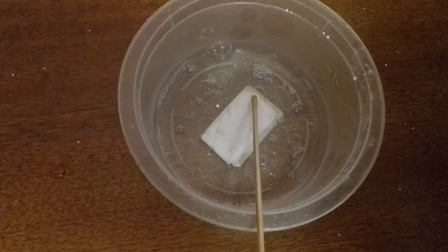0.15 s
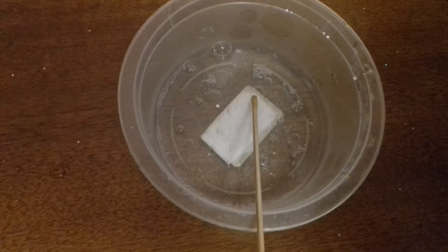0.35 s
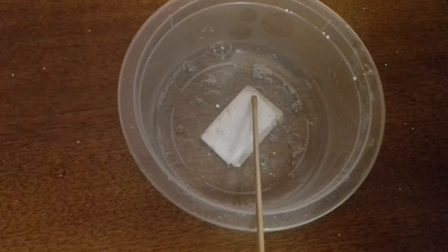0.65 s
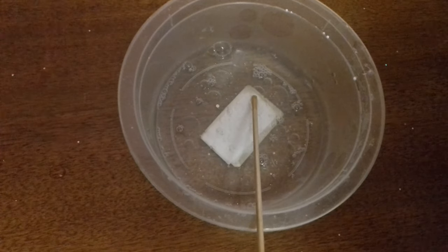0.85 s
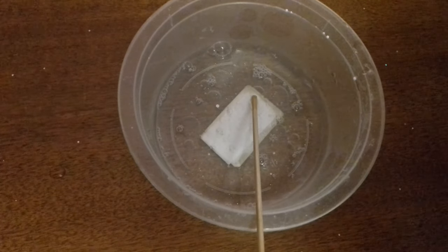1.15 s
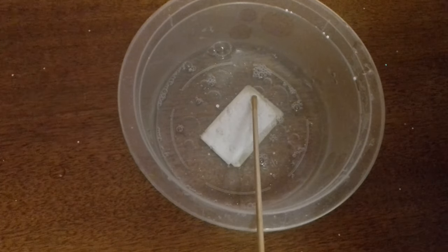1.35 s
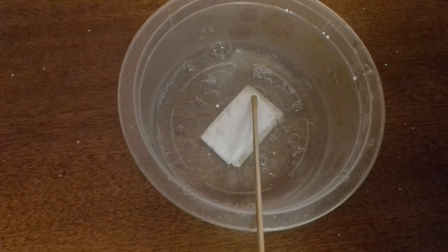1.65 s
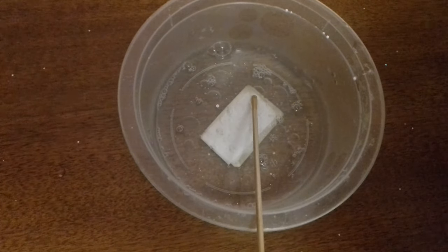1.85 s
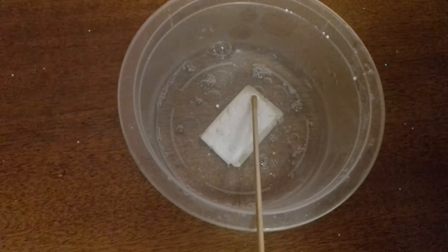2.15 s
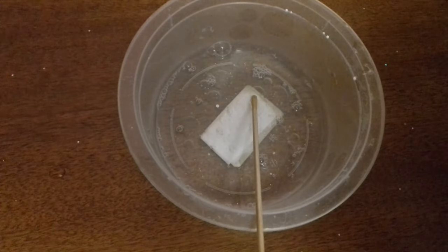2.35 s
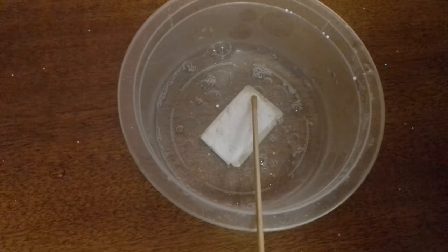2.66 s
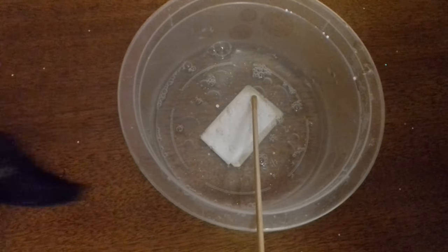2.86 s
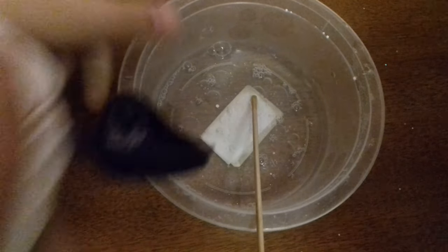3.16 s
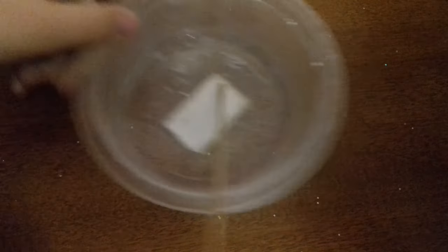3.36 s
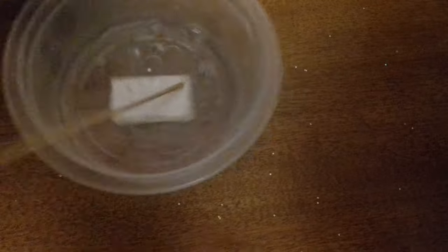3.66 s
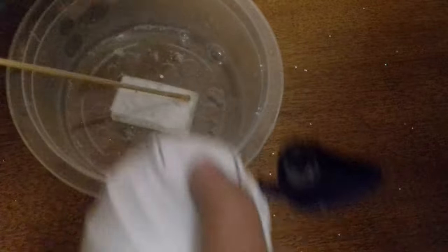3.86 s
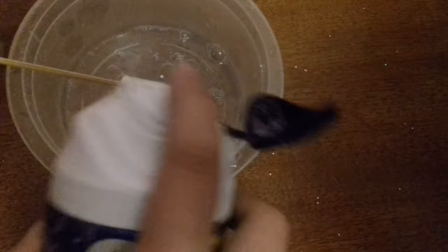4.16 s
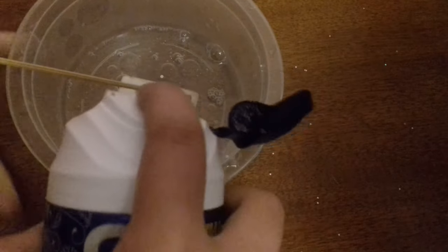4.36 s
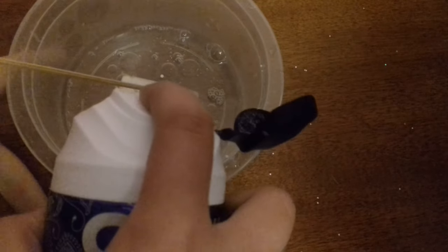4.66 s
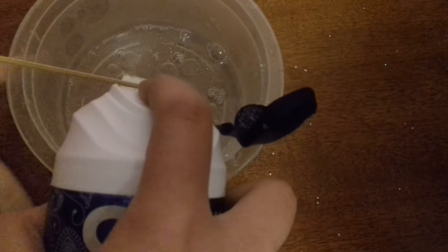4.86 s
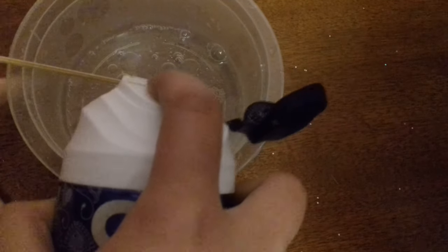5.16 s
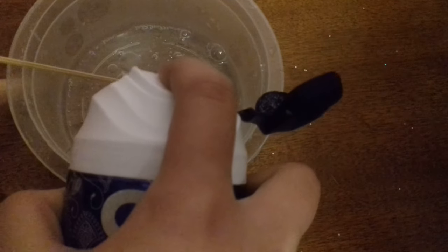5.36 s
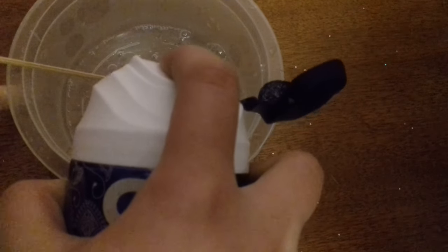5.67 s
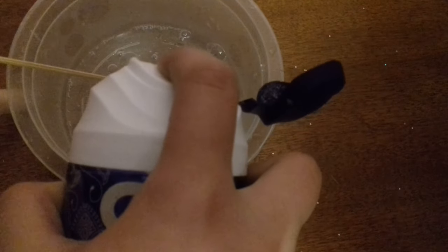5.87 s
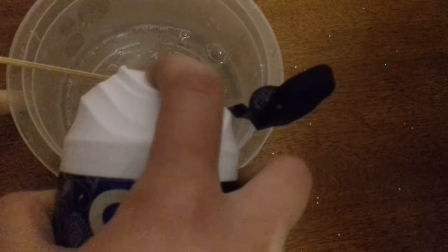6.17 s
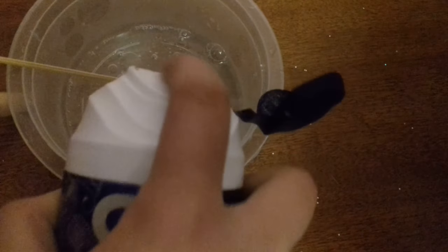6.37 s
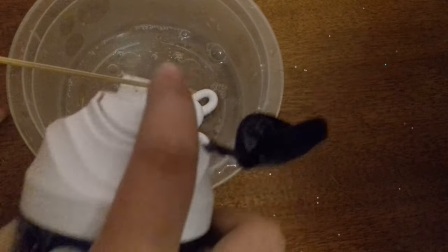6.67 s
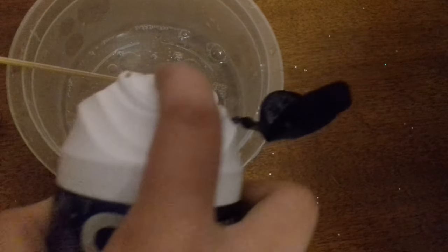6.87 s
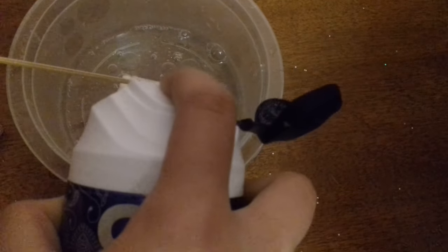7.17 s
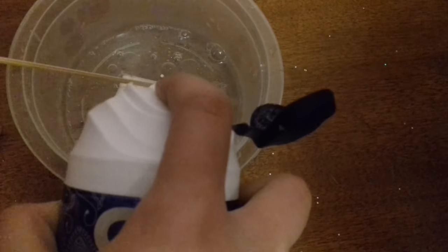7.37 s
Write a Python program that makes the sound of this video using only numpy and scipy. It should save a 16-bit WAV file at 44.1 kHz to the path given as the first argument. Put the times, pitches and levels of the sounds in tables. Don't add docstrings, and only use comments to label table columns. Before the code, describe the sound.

Small quiet room, faint air and microphone hiss, everything close and nearly dry. From 0 to 0.65 s a can is gripped busily: crinkling skin, dense plastic ticks and small hollow knocks. It calms to faint rubbing and isolated clicks, with a can knock at 1.4 s and sharper raps and a thin squeak around 2.0-2.2 s. At 3.3-3.5 s a plastic bowl is gripped and dragged, scraping and skipping over wood, then lands at 3.77 s with the loudest hard, hollow clack and a short rattle. The can knocks at 4.26 s. At 4.6-4.75 s the valve leaks, spits and pops sharply; a bowl nudge follows. Bright, grainy foam hiss flows from 4.8 to 5.43 s, then 5.58-5.88 and 5.92-6.4 s, surging, growing wetter. It stops with fading fizz; a knock at 6.52 s, then two brief spurts from 7.26 s to the end.

```python
import sys
import numpy as np
from scipy import signal
from scipy.fft import rfft, irfft, next_fast_len
from scipy.io import wavfile
from scipy.ndimage import map_coordinates

SR = 44100
rng = np.random.default_rng(int(sys.argv[2]) if len(sys.argv) > 2 else 0)


def waveform_to_disk(signal):
    frames = np.transpose(np.atleast_2d(signal))
    scaled = np.clip(frames, -1, 1) * 32767
    samples = np.round(scaled).astype(np.int16)
    wavfile.write(sys.argv[1], SR, samples)


def ratio_of_db(decibels):
    return 10 ** (np.asarray(decibels, float) / 20)


N = 331218

# pitch_hz, level_db (per Hz)
JET_SPECTRUM = [(35, -50.5), (60, -37), (489, -16), (984, -22), (1760, -21), (2700, -13.5), (3630, 1.5),
                (4800, -3.5), (6210, -21), (9440, -25), (12000, -30.5), (15800, -40)]
RUB_SPECTRUM = [(35, -36), (60, -10), (194, -14.5), (248, -21.5), (378, -8), (493, -14.5), (658, -7.5),
                (1710, 0), (2080, -5.5), (2970, -12), (4330, 0.5), (6040, -22), (12000, -36.5),
                (15600, -60), (22000, -120)]
AIR_SPECTRUM = [(30, -4.5), (64, -17), (141, -3), (435, -5.5), (906, -7.5), (2000, -13), (3020, -23.5),
                (4300, -12.5), (6000, -39), (15800, -31)]
SELF_NOISE_SPECTRUM = [(30, -10), (148, -7.5), (628, -9), (1840, -10.5), (4250, -18), (15800, -24)]

# pitch_hz, width_hz, level_db
NOZZLE_GAS = [(1450, 130, -31.5), (2350, 160, -10.5), (3230, 280, -5), (3780, 280, 9), (4410, 270, 2),
              (4900, 320, -3), (5050, 160, -27), (5500, 260, -7.5), (6680, 350, -12), (7770, 200, -43),
              (8450, 250, -18.5), (9650, 300, -33), (11020, 350, -28), (13700, 600, -35)]
NOZZLE_FOAM = [(1000, 170, -17.5), (2404, 310, -14), (3600, 480, -5), (4200, 170, -8.5), (4803, 240, 4.5),
               (5750, 310, -17), (6810, 310, -15), (7800, 320, -23), (8700, 280, -13.5), (9060, 220, -20),
               (9650, 380, -15.5), (10720, 430, -22.5), (11760, 250, -32.5), (13600, 700, -35)]
NOZZLE_DRY = [(960, 180, -9.5), (2000, 290, -13), (2750, 250, -18), (3700, 300, -2.5), (4130, 550, -1.5),
              (4950, 300, -7.5), (5690, 380, -14.5), (7500, 240, -30.5), (8800, 630, -17), (9920, 370, -16),
              (11640, 510, -27), (14020, 900, -26)]
SNAP_PEAKS = [(3020, 1500, 4), (4180, 780, 9), (5050, 810, -8), (5900, 670, -15), (6770, 600, -29)]
SHELL_PEAKS = [(1100, 270, -8), (1600, 330, -7), (2060, 230, 4.5), (2600, 146, -1.5)]
BOWL_PEAKS = [(171, 42, -1.5), (250, 24, -1), (305, 42, -5), (456, 89, -2.5)]
WALL_PEAKS = [(1020, 120, 11.5), (1382, 390, -4.5), (2030, 330, 5.5), (2950, 180, -8)]
# pitch_hz, level_db, t60_s
TABLE_MODES = [(302.6, -11, 0.11), (437, -3, 0.095), (468, -3.5, .08), (520, -2, 0.088), (598, -3, 0.084),
               (678, -12, .07), (755, -24, 0.074), (967, -5.5, 0.073), (1174, -16.5, 0.15),
               (1236, -17.5, 0.12), (1420, -18, 0.15), (2070, -23, .07), (2600, -15.5, .06)]
CAN_MODES = [(1200, -13.5, .12), (1820, -10, 0.14), (2240, -12, .05), (2490, -2.5, 0.15), (2550, -8, .12),
             (2870, -14, 0.072), (3300, 4, 0.066), (3640, -2, 0.1), (4040, -11, 0.055), (4250, -14, .15),
             (4460, -9, 0.15)]
# low_hz, high_hz
JET_BANDS = [(1870, 5990), (5790, 21000), (70, 1755)]

# peak_s, crinkle_db, rise_s (per 20 dB), fall_s (per 20 dB)
SQUEEZES = [(0.005, -49.5, .05, 0.12), (0.045, -51.5, 1, 0.08), (.087, -53.5, 0.5, 0.1),
            (.12, -62, -0.5, 0.5), (.157, -47, .015, 0.14), (.215, -52.5, 0.1, 0.13),
            (.262, -46, 0.1, 0.14), (.297, -50, 0.14, 0.1), (.345, -54.5, 0.07, 0.08),
            (.405, -50.5, .008, 0.18), (.445, -53, 0.16, 0.04), (.523, -44, 0.02, 0.0252),
            (.542, -46.5, 0.04, 0.08), (.64, -63.5, 0, 0.5)]
FIDGETS = [(.7, -81.5, 0.096, 0.7), (.876, -53.5, 0.26, 0.036), (1.08, -67.5, 0.71, 0.037),
           (1.238, -62, 0.5, 0.5), (1.85, -56, 0.11, 0.11), (1.93, -54.5, 0.13, 0.14),
           (1.995, -60, 0.019, 0.014), (2.03, -59, 0.044, 0.028), (2.31, -57.5, 0.023, 0.042),
           (2.447, -60, 0.18, 0.49), (2.6, -74, .02, 0.064), (2.73, -63, 0.27, 0.61),
           (3.066, -65.5, 0.61, 0.39), (4.187, -56.5, 0.022, 0.1), (7.195, -72, 0.051, 0.071),
           (4.87, -55.5, 0.08, 0.55)]
DRAGS = [
    (3.365, -51, 0.056, 0.058),
    (3.42, -43.5, 0.1, 0.34),
    (3.455, -42, 0.028, 0.085),
    (3.492, -38, 0.11, 0.011),
    (3.51, -50, 0.024, 0.28),
    (3.72, -69, 0.56, 0.27),
    (3.9, -48.5, 0.47, 0.11),
    (4.78, -51.5, .02, 0.078),
]
# peak_s, boom_db, rise_s (per 20 dB), fall_s (per 20 dB)
TABLE_LOADS = [(.53, -72, .1, .15), (3.3, -53, .012, .1), (3.405, -49, .03, .1), (3.51, -49, .025, .07),
               (3.58, -54, .04, .07), (3.67, -57, .08, .12), (3.775, -44, .008, .1), (3.86, -51, .12, .08),
               (3.94, -60, .08, .06), (4.02, -68, .05, .1), (4.75, -58, .02, .15), (4.8, -53, .06, .2),
               (4.86, -56, .1, .06), (4.96, -59, .15, .05), (5.04, -70, .1, .15)]
# peak_s, level_db, rise_s (per 20 dB), fall_s (per 20 dB)
BOWL_SHAKES = [
    (3.295, -61.5, 0, 0.84),
    (3.395, -44.5, 0.0354, 0.13),
    (3.49, -42, 0.0829, 0.1243),
    (3.545, -74.5, -2.5, -0.5),
    (3.775, -36.5, -0.03, 0.12),
    (4.785, -50, 0.08, 0.11),
    (4.92, -65, -1.4, 0.64),
]
# start_s, crinkle_db, body_db, scrape_db, fall_s (per 20 dB)
SETTLING = [
    (1.389, -50, -57, -51, 1.2),
    (1.999, -49, -71.5, -74, 0.2),
    (2.168, -53, -47.5, -68.5, 0.4),
    (3.773, -35.5, -38.5, -26, 0.26),
    (4.265, -58.5, -47, -55.5, 0.12),
    (4.745, -44, -53, -53, -1.5),
]
# start_s, snap_db, mid_db
TICKS = [(0.0217, -45, -64), (0.044, -43, -47), (0.1543, -52, -38), (0.206, -47, -46), (0.2487, -45, -40),
         (.261, -36, -62), (0.28, -42, -57), (.2935, -36.5, -60), (0.304, -45, -60), (.3371, -50, -55),
         (.445, -47, -53), (.4938, -47, -56), (.5033, -41, -59), (.538, -38, -51), (0.642, -60, -59),
         (0.8927, -46, -73), (1.0632, -41.5, -74), (1.1046, -43.5, -76), (1.2254, -45.5, -60),
         (1.998, -37, -66), (2.0394, -53, -70), (2.1492, -42.5, -50), (2.297, -65, -58),
         (2.489, -43.5, -73), (3.271, -51.5, -63), (3.3217, -65, -71), (3.3441, -50, -57),
         (3.5225, -39, -41), (3.567, -49, -62), (3.962, -36.5, -64), (3.974, -60, -72), (3.984, -54, -67),
         (4.5959, -36.5, -58), (4.9337, -42, -62), (5.3041, -36, -56), (5.3908, -47, -52),
         (5.546, -51, -75), (6.4757, -43.5, -65), (2.17, -35.5, -50), (3.4915, -32.5, -60),
         (3.3642, -43.5, -54)]
# start_s, snap_db, mid_db, body_hz, body_db
CAN_KNOCKS = [(0.0868, -44, -44, 891, -69), (0.1361, -47, -49, 784, -52.5), (0.234, -33.5, -55, 940, -49),
              (0.3164, -48, -46, 614, -66), (0.4025, -56, -43.5, 1100, -52),
              (0.5212, -34.5, -35.5, 980, -50), (1.3862, -32, -48.5, 540, -45),
              (1.992, -32.5, -53, 1130, -67), (2.157, -26, -38.5, 1220, -63), (4.1821, -52, -76, 1100, -62),
              (4.2611, -34, -35, 510, -44), (6.5227, -44, -51.5, 1110, -63)]
# start_s, snap_db, body_hz, body_db
BOWL_BUMPS = [
    (3.276, -47.5, 231, -67),
    (3.2906, -38, 250, -50.5),
    (3.38, -34, 236, -45.5),
    (3.4456, -27.5, 497, -56),
    (3.476, -31, 294, -44),
    (3.4846, -31, 408, -49.5),
    (3.4916, -31.5, 476, -39.5),
    (3.5415, -36, 310, -50.5),
    (3.7645, -13, 520, -29.5),
    (4.7797, -36, 253, -41),
]
# start_s, snap_db, mid_db
POPS = [
    (4.655, -39, -33.5),
    (4.6771, -22.5, -38.5),
    (4.712, -26, -50),
    (4.7216, -22, -48),
]
# start_s, level_db, low_hz, t60_s
CRACKS = [(0.99, -64, 5500, 0.02), (3.7655, -47, 3500, 0.0094), (6.4763, -49.5, 1700, 0.0087),
          (6.5255, -58, 5000, .012), (7.3945, -44, 2000, .01), (7.4435, -44, 1700, 0.014),
          (7.4695, -43, 2200, .01), (3.4925, -47, 4000, 0.0073), (3.5665, -53, 4000, .008),
          (2.17, -61, 5000, .012)]
# start_s, length_s, from_hz, to_hz, level_db
SQUEAKS = [
    (1.226, 0.015, 5110, 4760, -50.5),
    (1.99, 0.051, 2350, 2370, -57.5),
    (2.152, 0.063, 2555, 2600, -46.5),
    (3.791, 0.12, 3480, 4520, -49),
    (4.714, 0.0122, 2310, 3300, -35.5),
    (4.719, 0.013, 2685, 3440, -32.5),
    (3.764, 0.0049, 5900, 5380, -27.5),
]
# start_s, pitch_hz, level_db, t60_s
PINGS = [(1.3864, 559, -33, 0.038), (4.2612, 1480, -38, .04), (4.2626, 2430, -39, .04),
         (6.5253, 1137, -36, 0.022), (7.297, 1000, -52, .02), (7.394, 1010, -42.5, 0.031),
         (7.479, 1000, -50, .02), (7.488, 1000, -40, 0.028), (7.488, 1950, -45, .02),
         (2.296, 2600, -52, 0.044), (4.654, 4200, -26, .012), (2.151, 5400, -47, .02),
         (2.158, 4900, -47, .03)]
# start_s, level_db
SET_DOWNS = [
    (3.381, -45.5),
    (3.7655, -24),
    (4.2615, -42.5),
    (4.779, -46.5),
]
# start_s, level_db
RAPS = [
    (1.995, -54),
    (2.1575, -40),
    (4.2615, -53.5),
]
# start_s, end_s, first_db, last_db, fall_s (per 20 dB)
SPUTTERS = [
    (4.572, 4.606, -56.5, -50, -0.1),
    (4.628, 4.652, -35, -25.5, -0.09),
    (4.654, 4.666, -22.5, -20, -0.043),
    (4.672, 4.68, -29, -26, -0.05),
    (4.69, 4.716, -39, -43.5, -0.24),
    (4.717, 4.74, -34, -36.5, -0.1),
    (4.74, 4.7455, -35.5, -38, -0.11),
]
# start_s, end_s, first_db, last_db, edge_db (relative to jet)
HOLDS = [
    (4.757, 4.793, -44, -36.5, -13),
    (4.808, 4.896, -41, -42.5, -9.5),
    (4.905, 5.433, -43.5, -42, -6.5),
    (5.579, 5.779, -46.5, -40.5, -6),
    (5.802, 5.878, -41, -39.5, -4.5),
    (5.919, 6.396, -43, -37.5, -8),
    (7.257, 7.357, -52, -42, -14.5),
    (7.377, 7.518, -44, -39, -12.5),
]
# time_s, nozzle_share (0-1), heap_share (0-1)
FOAM = [(4.6, 0.07, 0.6), (4.9, 0.02, 0.7), (5.15, 0.01, 0.36), (5.43, 0.12, 0.43), (5.8, 0.17, 0.2),
        (5.95, 0.94, 0.31), (6.2, 0.87, 0.58), (6.3, 0.51, 0.72), (7.27, 0, 0.5), (7.5, 0.57, 0.95)]
# start_s, peak_db
SURGES = [(4.9152, -36), (4.9347, -30), (4.9586, -36), (5.0579, -36), (5.132, -30), (5.1522, -29),
          (5.2061, -32), (5.2275, -32), (5.2834, -25), (5.3048, -29), (5.3398, -30), (5.3906, -28),
          (5.5937, -30.5), (5.6451, -33), (5.7064, -37), (5.7289, -37), (5.7758, -30), (5.8066, -25.5),
          (5.8282, -28), (5.915, -37), (5.9843, -36), (6.0407, -28.5), (6.2342, -32), (7.2544, -43),
          (7.3093, -33), (7.3213, -34), (7.3736, -31), (7.389, -27), (7.414, -42), (7.4474, -34),
          (7.469, -28)]

# body, scrape, boom minus crinkle in dB; steepness of these low layers
SQUEEZE_COLOUR, FIDGET_COLOUR, DRAG_COLOUR = (-2, 2.5, -37, 1), (-12, -18.5, -32, 0.4), (-4.5, -14, -34, 1.2)
SETTLE_RISE_S, SETTLE_FIRST_FALL_S, SETTLE_TAIL_DB = 0.0035, 0.04, -16
TABLE_HZ, TABLE_SWAY_SHARE, TABLE_SWAY_PER_S, TABLE_RUMBLE, WALL_DB = 80, .06, 12, .45, -6
TICK_BODY_HZ, TICK_BODY_DB, TICK_T60_S = 500, -33, 0.03
CAN_T60_S, BOWL_MID_DB, BOWL_T60_S = 0.095, -14, 0.036
POP_BODY_HZ, POP_BODY_DB, POP_T60_S = 985, -39, 0.03
SQUEAK_WIDTH_HZ, SQUEAK_PURITY = 343, 1
SPUTTER_OPEN_S, SPUTTER_EDGE_DB, SPUTTER_SLOSH_DB, SPUTTER_SLOSH_FOLLOWS = 0.0021, -21.5, -40, 0.35
VALVE_OPEN_S, VALVE_SHUT_S, SLOSH_SHUT_S, EDGE_SHUT_S = 0.0059, 0.012, 0.065, .02
SLOSH_BARE_DB, SLOSH_HEAP_DB = -28, 20
FIZZ_DB, FIZZ_FALL_S = -19.5, 0.2
SURGE_DB, SURGE_DELAY_S, SURGE_RISE_S, SURGE_FALL_S = -10, 0.0016, 0.0027, 0.013
SPUTTER_END_S, WANDER_SHARE, WANDER_PER_S = 4.75, .004, 5
ROOM_T60_S, ROOM_DB, SPRAY_ROOM_DB, ROOM_BASS_CUT_HZ, ROOM_CUT_HZ = 0.35, -11, -18, 700, 6300
AIR_DB, SELF_NOISE_DB = -69.5, -68.5
BASS_CUT_HZ, TOP_HZ, OFFSET, OVERLOAD = 68.5, 15850, -0.00052, 0.61


def rms_one(x):
    return x / np.sqrt(np.mean(x ** 2) + 1e-20)


def colour(x, spectrum):
    hz, level_db = np.transpose(spectrum)
    size = next_fast_len(N)
    log_hz = np.log(np.arange(size // 2 + 1) * SR / size + 1)
    gain = ratio_of_db(np.interp(log_hz, np.log(hz), level_db))
    return rms_one(irfft(rfft(x, size) * gain, size)[..., :N])


def band(x, low_hz, high_hz):
    return signal.sosfilt(signal.butter(3, [low_hz, high_hz], "band", fs=SR, output="sos"), x)


def drift(rate):
    r = np.exp(-16 * np.pi * rate / SR)
    slow = signal.lfilter([1], [1, -2 * r, r * r], rng.standard_normal(N // 8 + 2002))[2000:]
    return np.interp(np.arange(N) / 8, np.arange(len(slow)), rms_one(slow))


def resonate(x, hz, width_hz):
    r = np.exp(-np.pi * width_hz / SR)
    feedback = [1, -2 * r * np.cos(2 * np.pi * hz / SR), r * r]
    return signal.lfilter(np.array([1, 0, -1]) * (1 - r * r) / 2, feedback, x + 1e-18)


def body_of(x, peaks):
    total = 0
    for k, (hz, width_hz, level_db) in enumerate(peaks):
        wide = 1.42 * width_hz
        total = total + (-1) ** k * ratio_of_db(level_db) * resonate(resonate(x, hz, wide), hz, wide)
    return total


def grains(per_s, spread_db):
    sizes = ratio_of_db(spread_db * np.minimum(rng.exponential(1, N), 5)) * rng.choice([-1, 1], N)
    return rms_one(sizes * (rng.random(N) < per_s / SR))


def gates(rows):
    t, power = np.arange(0, N + 16, 16) / SR, 1e-12
    for start, end, first_db, last_db, rise, fall in rows:
        outside = np.maximum((start - t) / max(rise, 1e-3), (t - end) / max(fall, 1e-3)).clip(0)
        hold_db = np.interp(t, [start, end], [first_db, last_db])
        power = power + ratio_of_db(2 * (hold_db - 20 * outside))
    return np.interp(np.arange(N) / SR, t, np.sqrt(power))


def swells(rows, shift_db=0, steep=1):
    return [(s, s, db + shift_db, db + shift_db, rise / steep, fall / steep) for s, db, rise, fall in rows]


def touch(layer):
    rows = []
    for gestures, tint in ((SQUEEZES, SQUEEZE_COLOUR), (FIDGETS, FIDGET_COLOUR), (DRAGS, DRAG_COLOUR)):
        *shift_db, steep = tint
        rows += swells(gestures, shift_db[layer - 1], steep) if layer else swells(gestures)
    if layer == 3:
        return gates(rows + swells(TABLE_LOADS))
    for s, *db, fall in SETTLING:
        first = (s, db[layer], SETTLE_RISE_S, SETTLE_FIRST_FALL_S)
        tail = (s, db[layer] + SETTLE_TAIL_DB, SETTLE_RISE_S, fall)
        rows += swells([first, tail])
    return gates(rows)


def handling():
    slips = grains(1800 * ratio_of_db(6.0 * drift(28)), spread_db=2.5) + 1.02 * rng.standard_normal(N)
    rub = colour(slips, RUB_SPECTRUM)
    bright = rms_one(band(rub, 2830, 7200)) + ratio_of_db(-31.5) * rms_one(band(rub, 9000, 14000))
    crinkle = touch(layer=0) * ratio_of_db(1.21 * drift(27.0)) * bright
    walls = rms_one(band(rub, 933, 2930)) + ratio_of_db(WALL_DB) * rms_one(body_of(slips, WALL_PEAKS))
    body = touch(layer=1) * ratio_of_db(1.4 * drift(20)) * walls
    scrape = touch(layer=2) * ratio_of_db(-5.0 + 1.5 * drift(14)) * rms_one(band(rub, 170, 1030))
    table_hz = TABLE_HZ * (1 + TABLE_SWAY_SHARE * drift(TABLE_SWAY_PER_S))
    table_tone = np.sin(2 * np.pi * np.cumsum(table_hz) / SR)
    boom = touch(layer=3) * ratio_of_db(1.5) * (table_tone + TABLE_RUMBLE * rms_one(band(slips, 80, 200)))
    hollow = gates(swells(BOWL_SHAKES)) * rms_one(body_of(slips, BOWL_PEAKS))
    return crinkle + body + scrape + boom + hollow


def contacts():
    ticks = [(s, db, mid, TICK_BODY_HZ, db + TICK_BODY_DB, TICK_T60_S) for s, db, mid in TICKS]
    can = [(*row, CAN_T60_S) for row in CAN_KNOCKS]
    bowl = [(s, db, db + BOWL_MID_DB, hz, body, BOWL_T60_S) for s, db, hz, body in BOWL_BUMPS]
    pops = [(s, db, mid, POP_BODY_HZ, db + POP_BODY_DB, POP_T60_S) for s, db, mid in POPS]
    return sorted(ticks + can + bowl + pops)


def knocks():
    s, snap_db, mid_db, body_hz, body_db, t60 = np.transpose(contacts())
    t, out = np.arange(SR // 6) / SR, np.zeros(N + SR)
    swell = np.minimum(t / 0.0012, 1) ** 2
    fade = ratio_of_db(-60 * t / 0.016) + 0.14 * ratio_of_db(-60 * t / np.clip(t60, .004, .3)[:, None])
    rattle = rng.standard_normal((len(s), 3, len(t)))
    burst = rattle * (swell * fade)[:, None]
    push = swell * ratio_of_db(-60 * t / 0.0021) + 0.34 * burst[:, 2]
    snap = band(body_of(burst[:, 0], SNAP_PEAKS), 1800, 9500)
    mid = body_of(burst[:, 1], SHELL_PEAKS)
    note = np.array([resonate(resonate(x, hz, 0.2 * hz), hz, 1.02 * hz) for x, hz in zip(push, body_hz)])
    hits = 0
    for x, level_db in ((snap, snap_db), (mid, mid_db + 2.0), (note, body_db + 7.0)):
        hits = hits + ratio_of_db(level_db)[:, None] * x / np.abs(x).max(axis=1, keepdims=True)
    for start, hit in zip((s * SR).astype(int), hits):
        out[start:start + len(t)] += hit
    return out[:N]


def crack():
    t, out = np.arange(SR // 20) / SR, np.zeros(N + SR)
    for s, level_db, low_hz, t60 in CRACKS:
        noise = signal.lfilter([1], [1, -.7], rng.standard_normal(len(t)))
        start = int(s * SR)
        out[start:start + len(t)] += band(ratio_of_db(level_db - 60 * t / t60) * noise, low_hz, 10000)
    return out[:N]


def squeaks():
    out, t = np.zeros(N), np.arange(SR // 8) / SR
    smooth = signal.butter(4, SQUEAK_WIDTH_HZ, fs=SR, output="sos")
    for s, length, from_hz, to_hz, level_db in SQUEAKS:
        rough = 8.7 * signal.sosfilt(smooth, rng.standard_normal((2, len(t))))
        phase = 2 * np.pi * np.cumsum(np.interp(t, [0, length], [from_hz, to_hz])) / SR
        tone = rms_one((rough[0] + SQUEAK_PURITY) * np.sin(phase) + rough[1] * np.cos(phase))
        envelope = ratio_of_db(level_db - 13 * (t / length) ** 2) * np.minimum(t / 0.0018, 1) ** 2
        start = int(s * SR)
        out[start:start + len(t)] += envelope * tone
    return out


def ring(blows, modes):
    s, db = np.transpose(blows)
    t, out = np.arange(SR // 4) / SR, np.zeros(N + SR)
    for start, level_db in zip((s * SR).astype(int), db):
        tone = 0
        for hz, mode_db, t60 in modes:
            decay = ratio_of_db(level_db + mode_db - 60 * t / t60)
            tone = tone + decay * np.sin(2 * np.pi * (hz * t + rng.random()))
        out[start:start + len(t)] += tone * np.minimum(t / 0.0014, 1)
    return out[:N]


def pings():
    return sum(ring([(s, db)], [(hz, 0, t60)]) for s, hz, db, t60 in PINGS)


def spits(shift_db, follows):
    rows = []
    for start, end, first, last, fall in SPUTTERS:
        rows.append((start, end, follows * first + shift_db, follows * last + shift_db, SPUTTER_OPEN_S, fall))
    return rows


def valve():
    s, share, heap = np.transpose(FOAM)
    t = np.arange(N) / SR
    jet_rows, edge_rows, slosh_rows = spits(0, 0.99), spits(SPUTTER_EDGE_DB, 1), []
    for start, end, first, last, edge_db in HOLDS:
        jet_rows.append((start, end, first, last, VALVE_OPEN_S, VALVE_SHUT_S))
        edge_rows.append((start, end, first + edge_db, last + edge_db, VALVE_OPEN_S, EDGE_SHUT_S))
        edge_rows += swells([(end, last + edge_db + FIZZ_DB, VALVE_OPEN_S, FIZZ_FALL_S)])
        slosh_rows.append((start, end, first, last, VALVE_OPEN_S, SLOSH_SHUT_S))
    jet_rows += swells([(at + SURGE_DELAY_S, db + SURGE_DB, SURGE_RISE_S, SURGE_FALL_S) for at, db in SURGES])
    spit = gates(spits(SPUTTER_SLOSH_DB, SPUTTER_SLOSH_FOLLOWS))
    splash = gates(slosh_rows) * ratio_of_db(SLOSH_BARE_DB + SLOSH_HEAP_DB * np.interp(t, s, heap))
    return gates(jet_rows), gates(edge_rows), np.hypot(spit, splash), np.interp(t, s, share)


def spray():
    start = 4 * SR
    flow, hiss, splash, foam = valve()
    foam = np.clip(foam[start:], 0, 1)
    turbulence = rng.standard_normal((3, N))
    eddies = ratio_of_db(1.8 * drift(160)) * (turbulence + 0.5 * grains(3000, spread_db=4.5))
    dry_nozzle = rms_one(body_of(eddies[0, start:], NOZZLE_DRY))
    gas = rms_one(body_of(eddies[0, start:], NOZZLE_GAS))
    wet = rms_one(body_of(eddies[1, start:], NOZZLE_FOAM))
    broad = colour(eddies[2], JET_SPECTRUM)[start:]
    sputtering = np.arange(start, N) < SPUTTER_END_S * SR
    steady = np.sqrt(1 - foam) * gas + np.sqrt(foam) * wet
    read_at = np.cumsum(1 + WANDER_SHARE * drift(WANDER_PER_S)[start:])
    wandering = map_coordinates(steady, [read_at], order=3, mode="mirror")
    jet = ratio_of_db(-5.0) * broad + np.where(sputtering, dry_nozzle, wandering)
    core, edge, slosh = (np.r_[np.zeros(start), rms_one(band(jet, *hz))] for hz in JET_BANDS)
    return flow * core + hiss * ratio_of_db(1.0 * drift(27)) * edge + splash * ratio_of_db(0.89 * drift(17)) * slosh


def room(x):
    t = np.arange(SR // 2) / SR
    tail = rng.standard_normal(len(t)) * ratio_of_db(-60 * t / ROOM_T60_S) * (t > .004)
    walls = signal.butter(1, [ROOM_BASS_CUT_HZ, ROOM_CUT_HZ], "band", fs=SR, output="sos")
    tail = signal.sosfilt(walls, tail)
    return signal.fftconvolve(x, tail / np.sqrt(np.sum(tail ** 2)))[:N]


def scene():
    hits = knocks() + crack() + ring(SET_DOWNS, TABLE_MODES) + ring(RAPS, CAN_MODES)
    jet = spray()
    walls = room(ratio_of_db(ROOM_DB) * hits + ratio_of_db(SPRAY_ROOM_DB) * jet)
    air = ratio_of_db(AIR_DB) * colour(rng.standard_normal(N), AIR_SPECTRUM)
    return np.tile(hits + jet + walls + handling() + pings() + squeaks(), (2, 1)) + air


def top_cut(x):
    return signal.sosfilt(signal.butter(12, 15770, fs=SR, output="sos"), x)


def record(dry):
    heard = signal.sosfilt(signal.butter(6, BASS_CUT_HZ, "high", fs=SR, output="sos"), dry)
    heard = OVERLOAD * np.tanh(heard / OVERLOAD)
    hiss = ratio_of_db(SELF_NOISE_DB) * colour(rng.standard_normal((2, N)), SELF_NOISE_SPECTRUM)
    kept = signal.sosfilt(signal.ellip(10, .5, 60, TOP_HZ, fs=SR, output="sos"), heard + hiss)
    return top_cut(kept + OFFSET)


dry = scene()
out = record(dry)
waveform_to_disk(out)
```